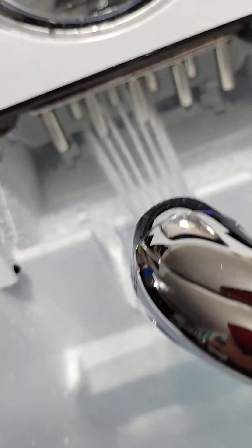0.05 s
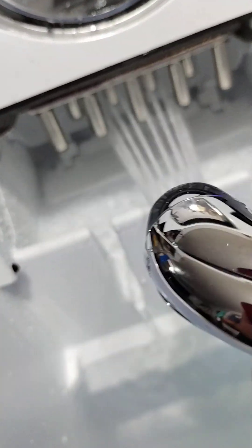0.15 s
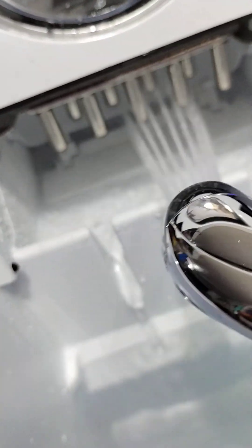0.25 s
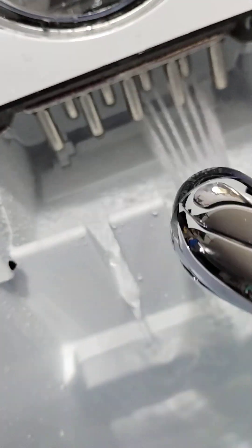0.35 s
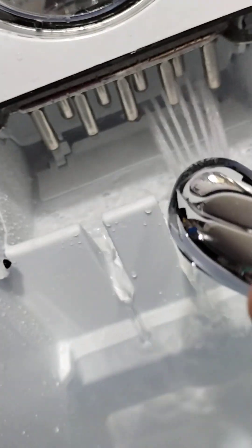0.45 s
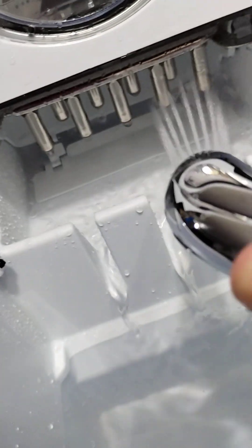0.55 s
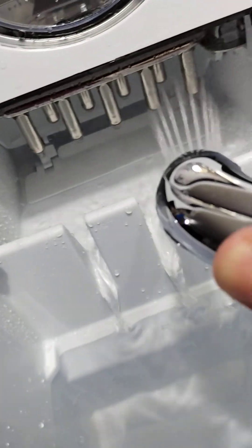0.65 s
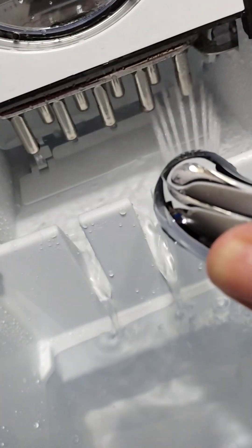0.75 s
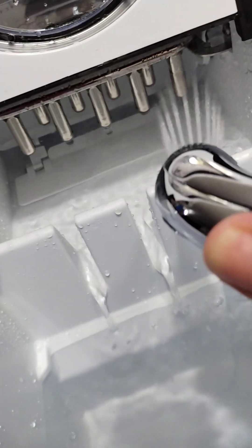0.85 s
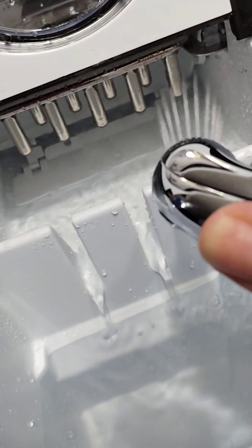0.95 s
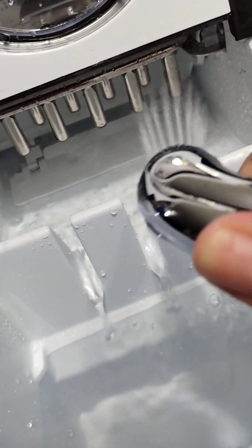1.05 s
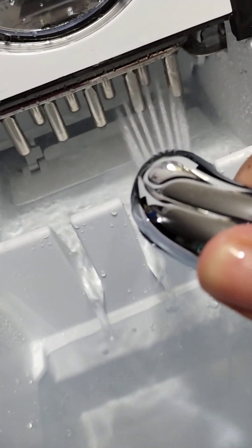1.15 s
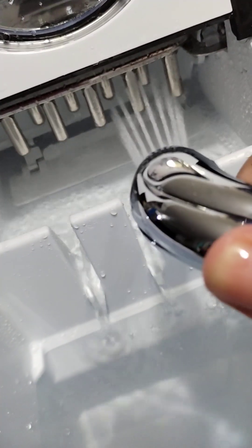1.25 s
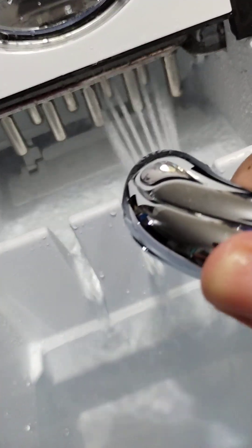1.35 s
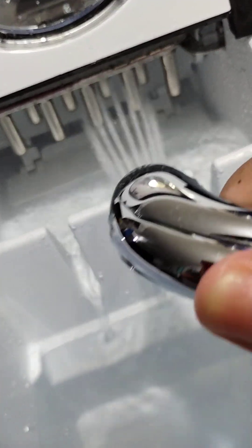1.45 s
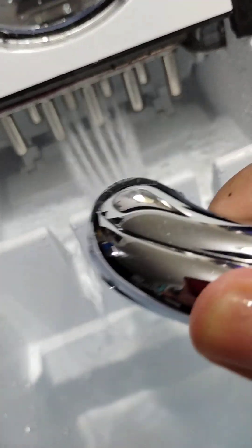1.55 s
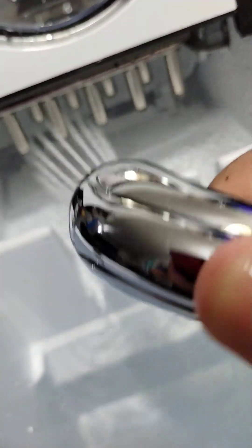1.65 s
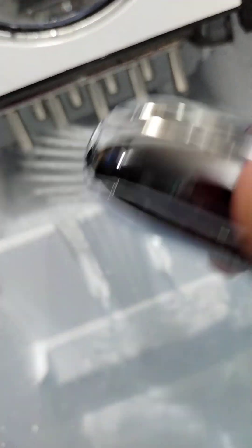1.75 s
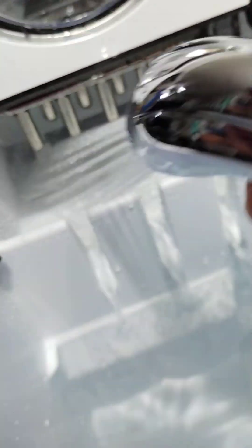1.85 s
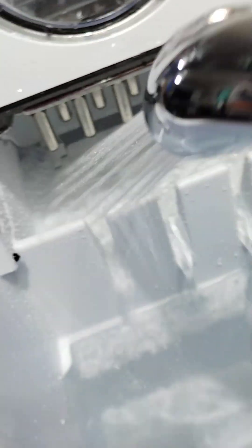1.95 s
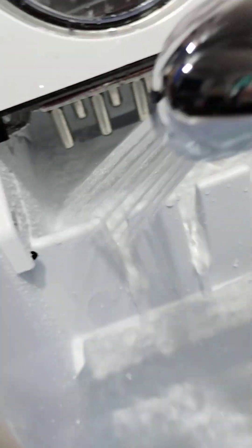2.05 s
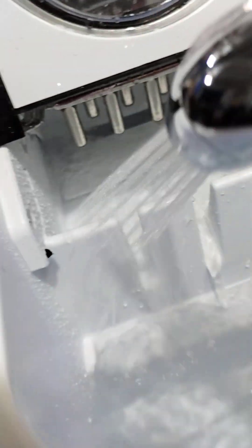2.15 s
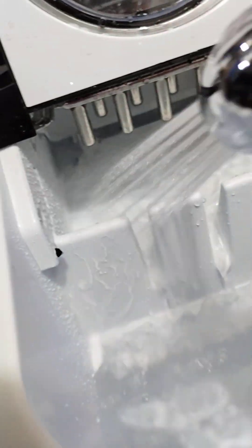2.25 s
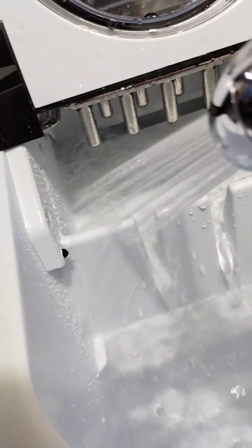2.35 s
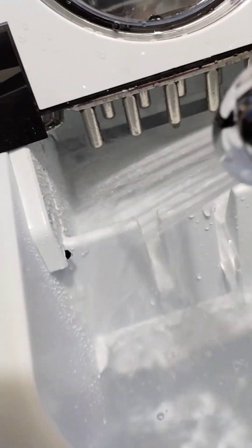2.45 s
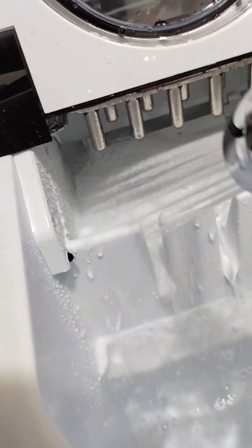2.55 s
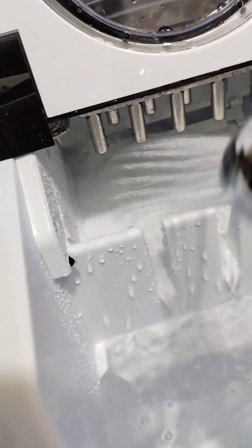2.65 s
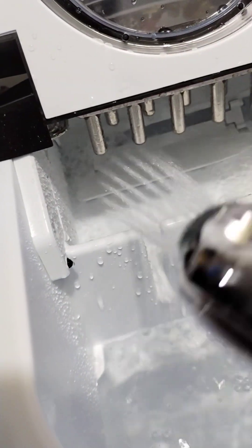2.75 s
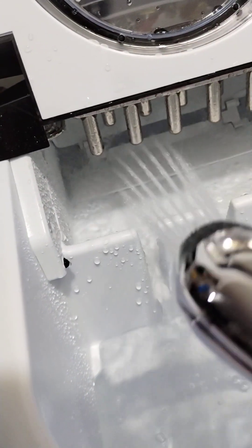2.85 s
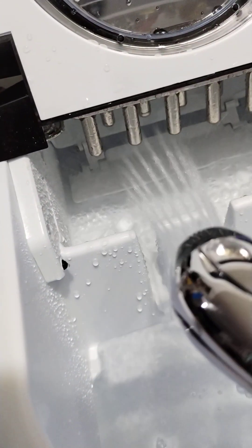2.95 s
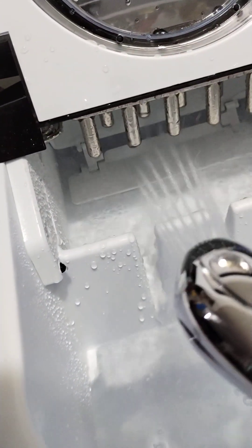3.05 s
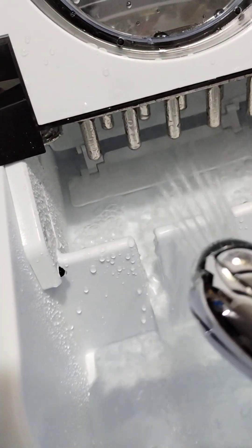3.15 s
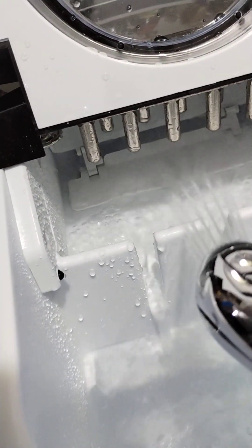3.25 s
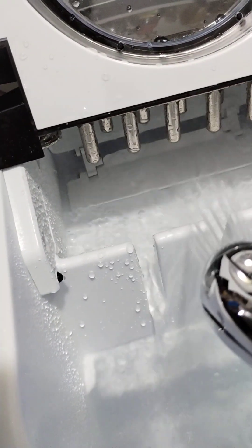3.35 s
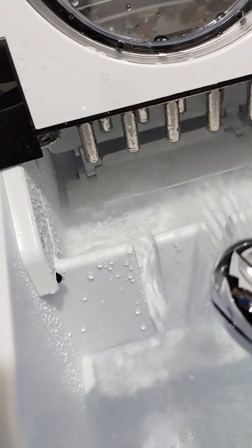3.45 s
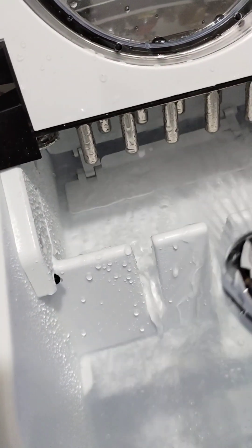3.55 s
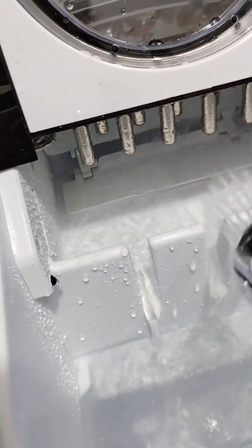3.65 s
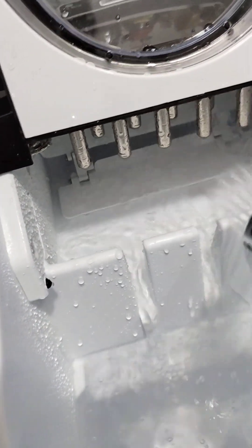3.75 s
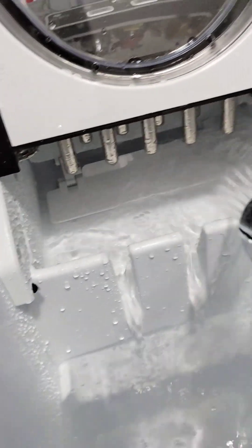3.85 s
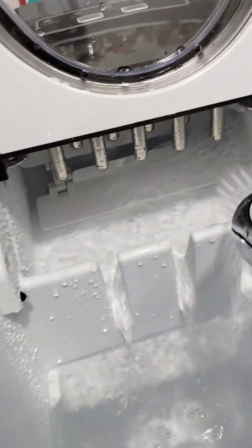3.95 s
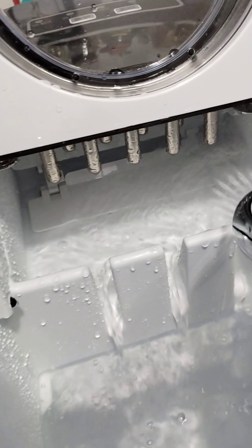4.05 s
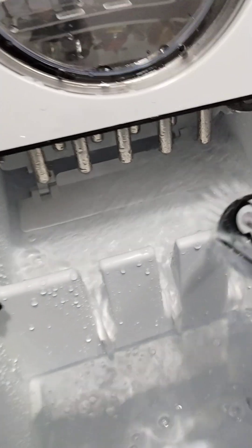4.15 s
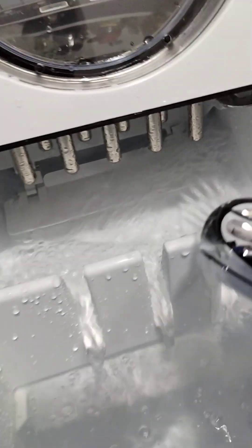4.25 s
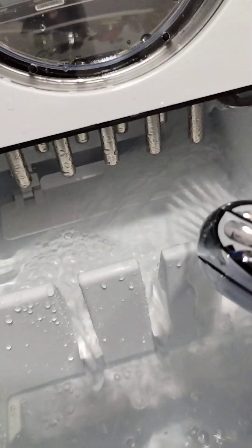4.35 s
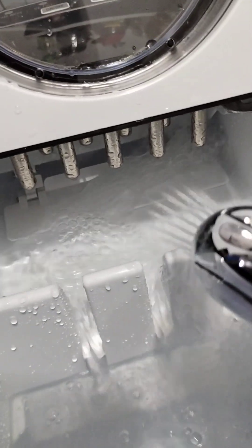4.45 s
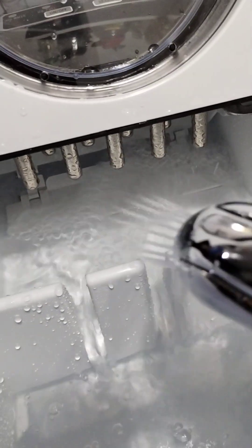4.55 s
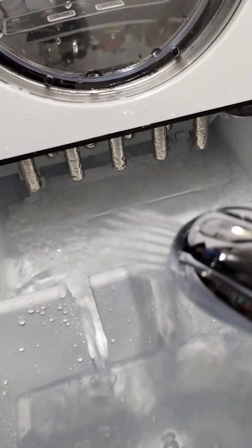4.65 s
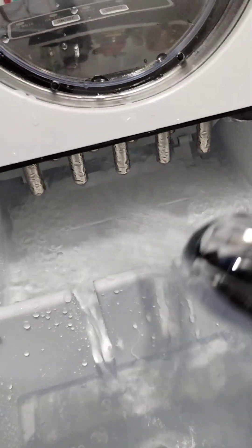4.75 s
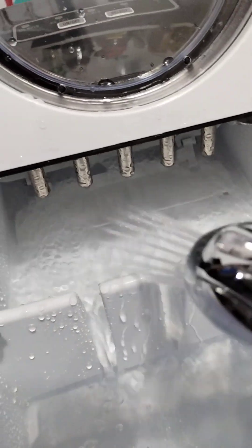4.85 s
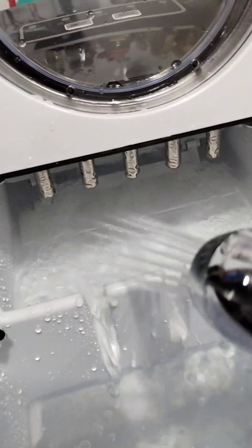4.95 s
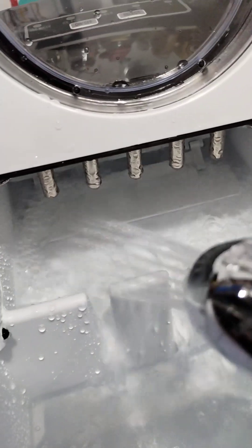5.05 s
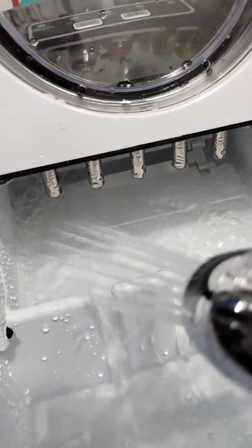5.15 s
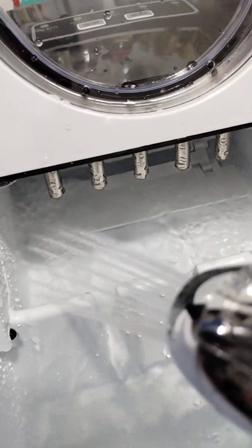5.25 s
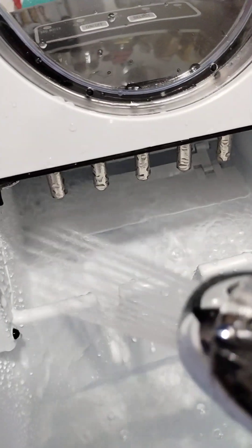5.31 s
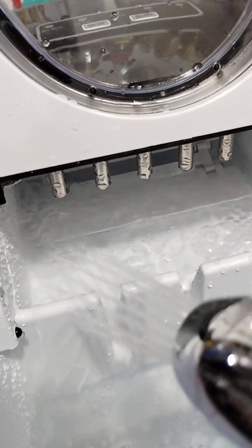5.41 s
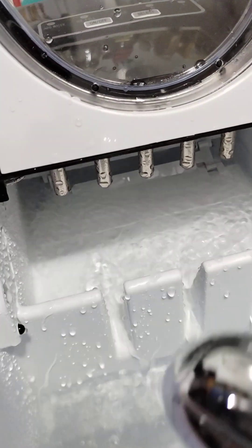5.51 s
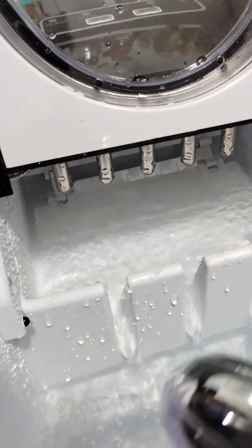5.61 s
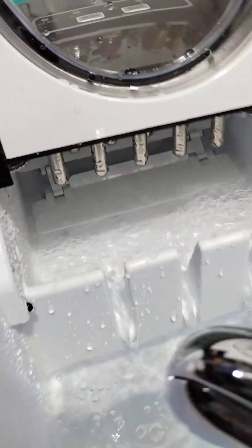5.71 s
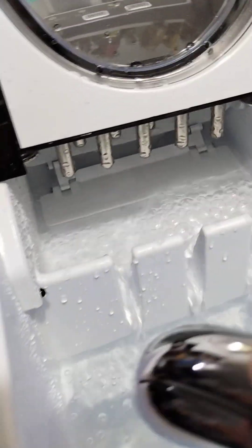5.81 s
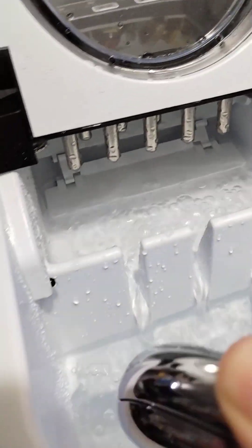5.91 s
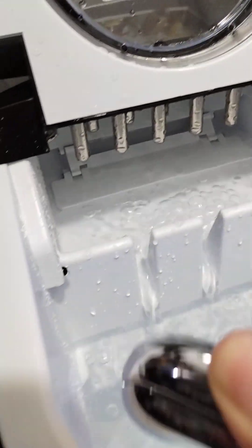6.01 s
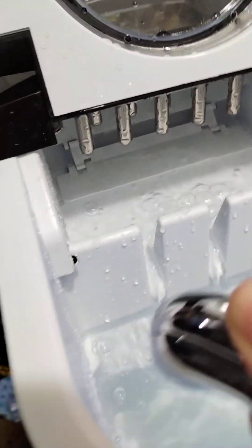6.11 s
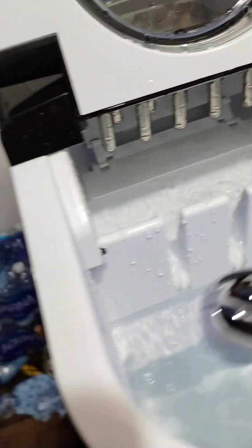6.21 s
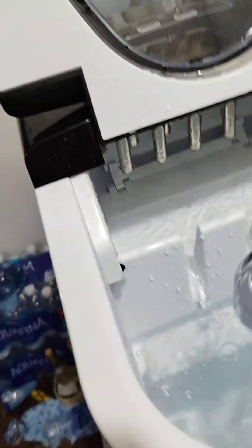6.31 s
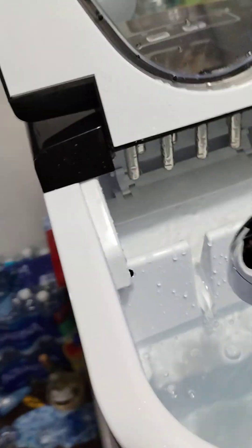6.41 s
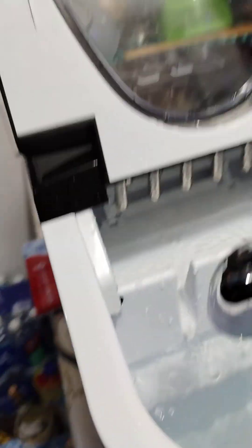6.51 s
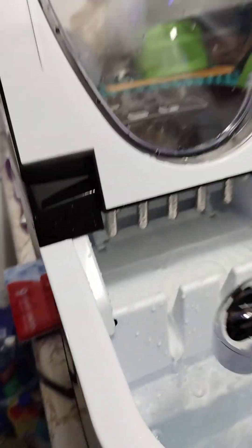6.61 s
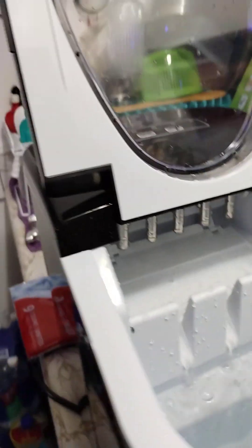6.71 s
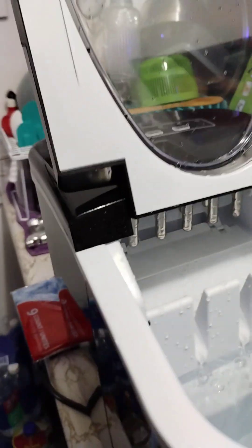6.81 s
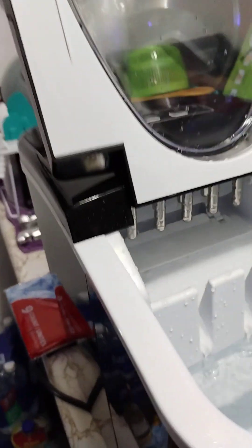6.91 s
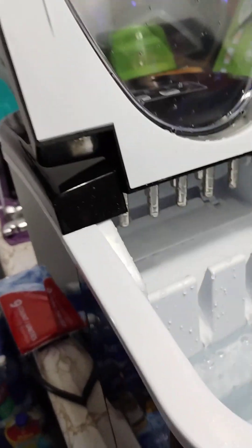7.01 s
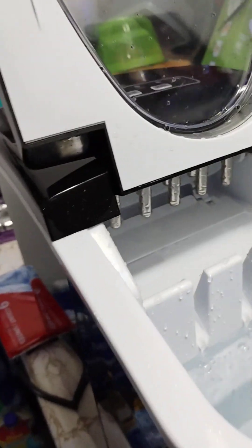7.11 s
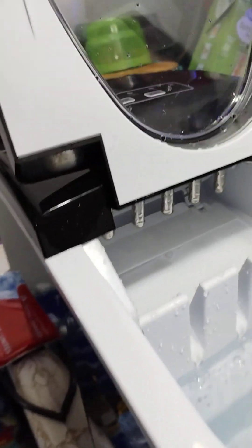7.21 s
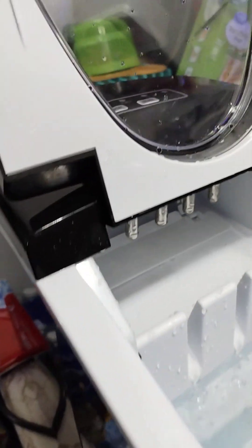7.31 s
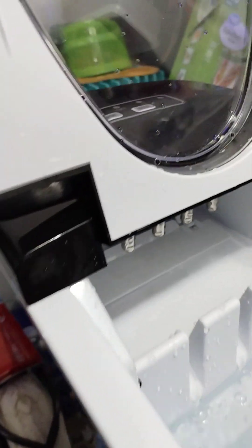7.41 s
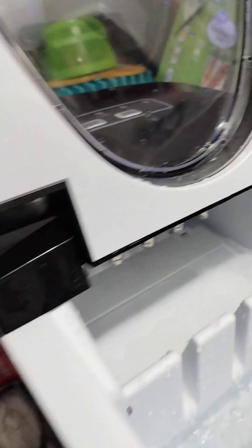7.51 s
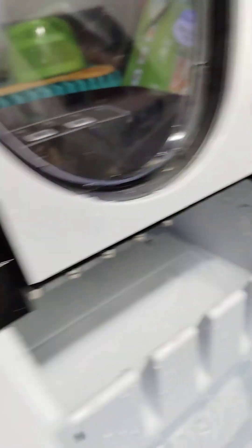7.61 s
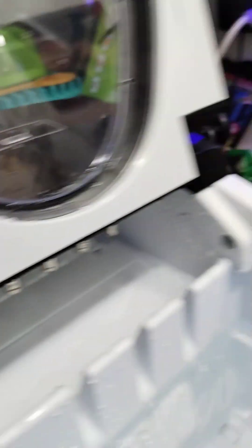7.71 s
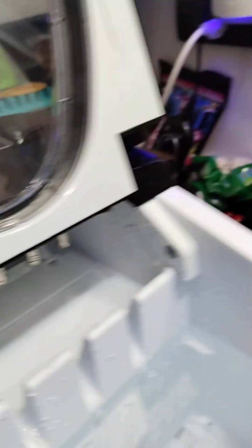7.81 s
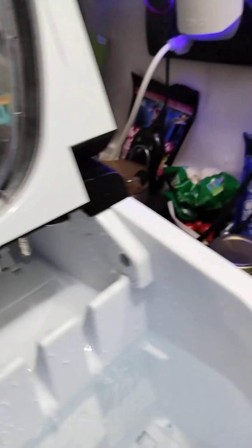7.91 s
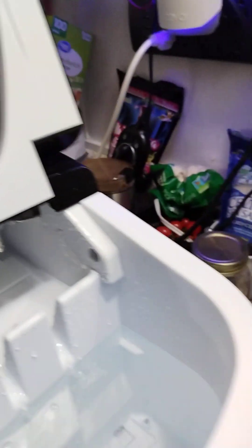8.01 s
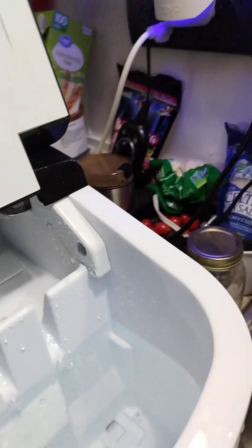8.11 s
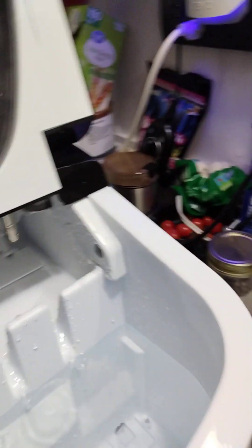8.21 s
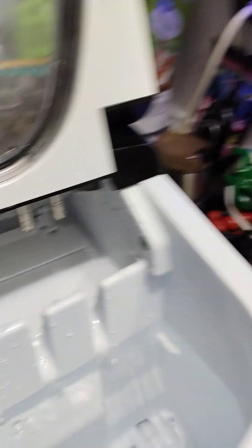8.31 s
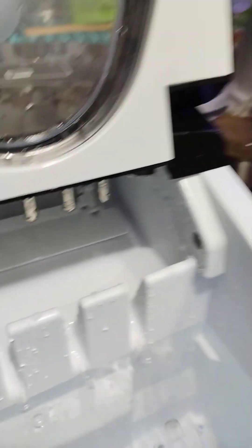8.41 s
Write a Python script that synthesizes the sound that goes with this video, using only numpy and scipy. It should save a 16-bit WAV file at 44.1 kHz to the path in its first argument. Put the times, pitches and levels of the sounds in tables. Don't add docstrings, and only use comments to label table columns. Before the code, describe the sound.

In a kitchen, heard in close stereo, a spray head hisses loudly over plastic, the fine treble leaning left, with snapping drops and shifting hollow drumming. Past the midpoint a plastic click and jolt shut the spray, water sags to a trickle, then a quieter aerated flow splashes in the sink while a tray gurgles empty. A faint motor drone sits behind. Low thuds and a scraping, juddering bin close the scene.

```python
import sys
import numpy as np
from scipy import signal
from scipy.io import wavfile
from scipy.ndimage import uniform_filter1d

SR = 44100
rng = np.random.default_rng(int(sys.argv[2]) if len(sys.argv) > 2 else 0)


def int16_out(signal):
    q = np.round(np.clip(np.atleast_2d(signal).T, -1, 1) * 32767)
    wavfile.write(sys.argv[1], SR, q.astype(np.int16))


def rack_gain(trim_db):
    fader = np.asarray(trim_db, float)
    return 10 ** (fader / 20)


N = 373382
HOP, FRAME = 128, 1024
HZ = np.fft.rfftfreq(FRAME, 1 / SR)[:, None]
FRAMES = N // HOP + 2
TIME = np.arange(FRAMES) * HOP / SR


def evened(x):
    return x / np.sqrt(np.mean(x ** 2) + 1e-20)


def read(points, hz=HZ):
    f, value = np.transpose(points)
    return np.interp(np.log(hz + 1), np.log(f + 1), value)


def peaks(modes):
    power = 0
    for hz, width, db in modes:
        power = power + rack_gain(db) ** 2 / (1 + (2 * (HZ - hz) / width) ** 2) ** 1.7
    return 10 * np.log10(power)


def over_time(points):
    return np.interp(TIME, *np.transpose(points))


def curves(rows):
    s, level_db, *rest = np.transpose(rows)
    return [np.interp(TIME, s, level_db, -120, -120)] + [np.interp(TIME, s, c) for c in rest]


def swelled(level_db, runs, offset_db):
    extra = 0
    for s, length, db in runs:
        shape = np.clip(1 - (2 * (TIME - s) / length - 1) ** 4, 0, 1)
        extra = extra + rack_gain(db + offset_db) ** 2 * shape
    return 10 * np.log10(rack_gain(level_db) ** 2 + extra)


def drift(size):
    return evened(uniform_filter1d(uniform_filter1d(rng.standard_normal(FRAMES), size), size))


def drops(per_s, spread_db, share):
    size = rack_gain(spread_db * np.minimum(rng.exponential(1, N), 3.3))
    size = size * (rng.random(N) < per_s / SR)
    burst = np.sqrt(signal.lfilter([1], [1, -.94], size ** 2))
    share = np.clip(share, 0, 1)
    return (share * evened(burst) + 1 - share) * rng.standard_normal((2, N))


def voiced(drive, layers, balance, same, lead, patchy_db, flicker_db):
    a, b = signal.stft(evened(drive), nperseg=FRAME, noverlap=FRAME - HOP)[2][:, :, :FRAMES]
    power = 0
    for shape_db, level_db in layers:
        wander_db = flicker_db * drift(size=9)
        power = power + evened(rack_gain(shape_db)) ** 2 * rack_gain(level_db + wander_db)[:a.shape[1]] ** 2
    patches = uniform_filter1d(rng.standard_normal(a.shape), size=14, axis=0)
    patches = evened(uniform_filter1d(patches, size=24, axis=1))
    c, lean = np.clip(read(same), 0, 1), rack_gain(read(balance))
    right = c * a * np.exp(-1j * read(lead)) + np.sqrt(1 - c ** 2) * b
    z = np.array([lean * a, right]) * 2 / np.sqrt(1 + lean ** 2 + c * lean)
    z = z * np.sqrt(power) * rack_gain(patchy_db * patches)
    return signal.istft(z, nperseg=FRAME, noverlap=FRAME - HOP)[1][:, :N]


def rings(modes, level_db):
    out = np.zeros((2, N))
    for hz, width, db in modes:
        a, b = rng.standard_normal((2, N))
        both = [a, 1.76 * a + 0.56 * b]
        out += rack_gain(db) * evened(signal.lfilter(*signal.iirpeak(hz, hz / width, SR), both))
    return out * rack_gain(np.interp(np.arange(N), np.arange(FRAMES) * HOP, level_db))


def hits(rows, rise_s):
    out, t = np.zeros((2, N)), np.arange(SR // 4) / SR
    for s, db, hz, t60, lean_db in rows:
        ring = np.sin(2 * np.pi * hz * t) + 0.39 * np.sin(2 * np.pi * 1.17 * hz * t)
        ring *= rack_gain(db - 60 * t / t60) * (1 - np.exp(-t / rise_s))
        part = out[:, round(s * SR):][:, :len(t)]
        ports_db = np.array([[lean_db / 2], [-lean_db / 2]]) - abs(lean_db) / 4
        part += rack_gain(ports_db) * ring[:part.shape[1]]
    return out


# f/Hz, level/dB per Hz
FIZZ = [(2500, -32), (4200, -13.5), (5000, -16), (6800, -10.5), (8000, -6.5), (9000, 1.5), (10000, -3.5),
        (11500, -10.5), (13000, -14), (15000, -12.5)]
# t/s, brightness/dB per octave, hiss centre/share of its usual pitch
FACING = [(0, 7, 0.99), (.6, 1.5, 1.01), (1.2, 3, 0.99), (1.45, 4, 1.01), (1.75, 2.5, 1.03), (1.9, 0, 0.99),
          (2.4, -1, 0.99), (2.65, 1, 1.016), (3.0, 4, 1.005), (3.8, 1, 0.99), (4.3, -3.5, 1.),
          (4.6, 8, .99), (4.9, -5, .98), (5.2, -3, 0.99), (5.6, -6, .97)]


def fizz_colour():
    s, tilt_db, share = np.transpose(FACING)
    hz = HZ / np.interp(TIME, s, share)
    octaves_up = np.log2(np.maximum(hz, 9500) / 9500)
    return read(FIZZ, hz) + np.interp(TIME, s, tilt_db) * octaves_up


# t/s, force of the fine drops/dB, lean from the tray towards the walls/dB
JETS = [(0, -21.5, -1.5), (.3, -21.5, 1), (.55, -22.5, -2), (.8, -21.5, 3), (1.1, -21.5, 0),
        (1.45, -23, 1.3), (1.95, -20.5, 1), (2.4, -20, 0.3), (2.85, -21.5, -2.5), (3.2, -20.5, 1.5),
        (3.6, -21, 2.5), (3.85, -21, -1.5), (4.15, -18.5, -4), (4.5, -21.5, -0.5), (4.7, -22, 2),
        (4.85, -20, 2), (5.2, -21.5, -1.5), (5.57, -21, -3.5)]
# middle t/s, half length/s, loss/dB
LULLS = [(0.115, .03, 3.5), (0.436, .008, 6), (1.339, .018, 4), (1.372, 0.018, 5), (1.83, .01, 2.5),
         (5.45, 0.024, -1.5), (1.53, 0.064, 1), (1.782, 0.015, 4.5), (2.473, 0.021, 5), (3.153, 0.072, 5.5),
         (3.895, 0.048, 1.5), (4.483, .05, 2), (5.122, 0.016, 1.5)]
# start t/s, length/s, level/dB
BURSTS = [(0.343, 0.038, -17.5), (0.409, 0.051, -25), (0.648, 0.34, -17), (0.95, 0.034, -17),
          (1.03, 0.064, -20), (1.984, 0.081, -20), (2.226, 0.043, -20), (2.572, 0.11, -20.5),
          (3.223, 0.041, -19), (3.293, 0.029, -19), (3.336, 0.052, -21), (3.452, 0.056, -18),
          (3.487, 0.045, -20), (3.607, 0.03, -14), (3.66, 0.046, -15.5), (3.941, 0.042, -19),
          (4.06, 0.1, -18), (4.254, 0.054, -19), (4.37, 0.037, -21), (4.958, 0.043, -16.5),
          (5.064, 0.062, -15), (5.237, 0.039, -20), (5.32, 0.063, -18)]
# start t/s, length/s, level/dB
PANEL_RUNS = [(0.01, 0.077, -29), (0.715, 0.13, -25), (.92, 0.09, -40), (1.273, 0.054, -32),
              (1.7, 0.23, -30), (1.93, 0.041, -31), (2.354, 0.068, -30.5), (2.724, 0.29, -31),
              (3.38, 0.17, -29.5), (3.58, 0.16, -29), (4.1, 0.092, -31), (4.302, .08, -37),
              (4.66, 0.35, -29.5), (5.028, 0.086, -29.5), (5.17, 0.082, -31.5)]
# start t/s, length/s, level/dB
PLUNGES = [(0.07, 0.058, -31.5), (0.258, 0.12, -32), (0.73, 0.06, -31), (1.048, 0.045, -33),
           (1.22, 0.11, -30.5), (1.422, 0.22, -29), (1.85, 0.26, -34.5), (2.472, 0.28, -32),
           (2.777, .27, -29), (3.12, .12, -33.5), (3.295, 0.23, -34), (3.935, 0.089, -33), (4.6, 0.3, -35),
           (4.9, 0.21, -34), (5.12, .27, -31.5)]
# start t/s, length/s, level/dB
TRAY_RUNS = [
    (0., 0.47, -32),
    (2.202, 0.24, -41),
    (2.76, 0.11, -34),
    (3.725, .08, -36),
    (4.103, 0.16, -35),
    (4.727, 0.26, -35),
    (5.24, 0.027, -30.5),
    (5.454, 0.075, -34),
]
WALLS_DB, TRAY_DB, PATTER_DB, POOL_DB = -36.5, -35.5, -28, -39.5
USUAL_DB, WALLS_FOLLOW, TRAY_FOLLOW, PATTER_FOLLOW = -23, 0.06, 0.13, 0.19
WALLS_LEAN, TRAY_LEAN = 0.63, -1.08
DROWN_DB_PER_S = 0.93
SHUT_S, SHUT_DB_PER_S, RING_ON_DB, RING_ON_S = 5.588, 1200, -4, 0.025


def spray_levels():
    s, force_db, aim = np.transpose(JETS)
    force_db, aim = np.interp(TIME, s, force_db), np.interp(TIME, s, aim)
    for middle_s, half_s, loss_db in LULLS:
        force_db = force_db - loss_db * np.exp(-((TIME - middle_s) / half_s) ** 2)
    change = force_db - USUAL_DB
    shut = SHUT_DB_PER_S * np.maximum(TIME - SHUT_S, 0)
    ring_on = np.where(TIME < SHUT_S + RING_ON_S, np.maximum(-shut, RING_ON_DB), -shut)
    walls = WALLS_DB + WALLS_FOLLOW * change + WALLS_LEAN * aim
    tray = TRAY_DB + TRAY_FOLLOW * change + TRAY_LEAN * aim
    return [swelled(force_db + 0.5, BURSTS, -4) - shut,
            swelled(walls, PANEL_RUNS, -5) + ring_on,
            swelled(POOL_DB + 0 * TIME, PLUNGES, -6) + ring_on,
            swelled(tray, TRAY_RUNS, 0) + ring_on,
            PATTER_DB + PATTER_FOLLOW * change - DROWN_DB_PER_S * TIME - shut]


# t/s, level/dB, fade/s
SLAPS = [
    (1.396, -15.5, 0.033),
    (1.631, -13, 0.012),
    (1.697, -13, 0.018),
    (1.798, -17, 0.013),
    (3.936, -19, .015),
    (4.374, -17, 0.012),
    (4.722, -22, .015),
    (5.239, -15, .02),
]


def slaps():
    t = np.arange(N) / SR
    level = np.zeros(N)
    for s, db, fade_s in SLAPS:
        at = slice(round(s * SR), round((s + .15) * SR))
        level[at] += rack_gain(db) * np.exp(-(t[at] - s) / fade_s)
    treble = signal.butter(1, [8300, 10300], "band", fs=SR, output="sos")
    return signal.sosfilt(treble, level * rng.standard_normal(N)) * rack_gain([[9], [-10]])


# f/Hz, level/dB per Hz
PATTER = [(100, -42), (250, -9), (700, -39), (1100, -9), (1400, -5), (2300, -1), (3000, -2.5), (4200, -4),
          (5500, -5), (7000, -15)]
# f/Hz, width/Hz, level/dB
WALLS = [(363.7, 49, -1), (419.8, 30.5, 3), (321, 26, -15), (566, 150, -9.5), (945, 460, -18.5)]
# f/Hz, width/Hz, level/dB under the drumming
WALL_RINGS = [(352.8, 8, -4.5), (424, 8, -3.5)]
CAVITY = 660, 21, 179, -3.5
# f/Hz, width/Hz, level/dB under the pool
POOL_RING = [(742, 22, -4.5)]
# f/Hz, width/Hz, level/dB
TRAY = [(1756, 120, 5), (1580, 1600, -15), (1997, 480, -5)]
# t/s, share of the usual pitch
TRAY_PITCH = [(0, 1), (.4, 1.02), (.7, 1.02), (1.5, 0.99), (2.2, 1.016), (3.2, 0.98), (4., 1.008),
              (5.6, 1.016)]
# f/Hz, width/Hz, level/dB
RIBS = [(2775, 160, -1), (3150, 160, -1), (3420, 300, -4.5), (3840, 140, -2.5)]
# t/s, level/dB
RIBS_STRUCK = [(0, -34), (.3, -30.5), (.5, -32.5), (.8, -29.5), (1.05, -38.5), (1.35, -30), (1.8, -33.5),
               (2.2, -40), (2.5, -39), (2.85, -37.5), (3.2, -49), (4.8, -35.5), (5.2, -58), (5.45, -48),
               (5.56, -43), (5.6, -90)]
# f/Hz, left over right/dB
SPRAY_BALANCE = [(60, 5), (92, -9), (140, -15), (210, 4), (330, -4.5), (500, 7.5), (760, -1.5), (1160, 2),
                 (1770, -6.5), (2710, -1.5), (4130, -1.5), (6310, 4.5), (9630, 24.5), (14700, 13)]
# f/Hz, likeness of the ports/0-1
SPRAY_SAME = [(100, 0.9), (400, 0.95), (860, 0.58), (1300, 0.23), (2200, 0.43), (2800, 0.31), (3500, 0.58),
              (4500, 0.16), (14000, 0.038)]
# f/Hz, lead of the left port/radians
SPRAY_LEAD = [(100, 0.12), (520, 1.06), (860, 0.11), (1200, 1.1), (1550, 0.33), (1900, 1.7), (2250, 3.5),
              (3300, 4.82), (4000, 7.56), (5300, 9.2), (14000, 29)]


def spray():
    fizz, walls, pool, tray, patter = np.array(spray_levels()) + 0.6 * drift(size=5)
    start_hz, rise, width, db = CAVITY
    pitch = over_time(TRAY_PITCH)
    tray_modes = [(hz * pitch, w, d) for hz, w, d in TRAY]
    layers = [(fizz_colour(), fizz), (peaks(WALLS), walls),
              (peaks([(start_hz + rise * TIME, width, db)]), pool),
              (peaks(tray_modes), tray), (read(PATTER), patter),
              (peaks(RIBS), curves(RIBS_STRUCK)[0])]
    wet = voiced(drops(1200, 3.6, 0.24), layers, SPRAY_BALANCE, SPRAY_SAME, SPRAY_LEAD, 0.98, 0.7)
    return wet + rings(WALL_RINGS, walls) + rings(POOL_RING, pool) + slaps()


# t/s, peak level/dB, f/Hz
SNAPS = [(.4143, -8, 9300), (.4143, -13, 11200), (.4265, -11, 8900), (.445, -13, 10800), (.45, -6, 9100),
         (.45, -9, 10600), (.455, -6, 8900), (.451, -17, 7200), (3.831, -13, 5650), (3.832, -17, 6260),
         (4.125, -3, 7900), (1.0385, -20, 3260), (1.3199, -18, 3410), (2.5651, -21, 3870),
         (3.1557, -28, 3340), (4.5361, -22, 3720), (5.2929, -22, 4480), (.483, -23, 3400),
         (.865, -20, 3300), (4.3, -18, 7200), (1.277, -14, 9000), (1.313, -11, 9550), (1.313, -16, 8300),
         (1.482, -15, 10500), (4.65, -13, 7000)]


def snaps():
    return hits([(s, db, hz, 106 / hz, read(SPRAY_BALANCE, hz)) for s, db, hz in SNAPS], 0.00009)


# t/s, peak level/dB, f/Hz, t60/s
CLACKS = [
    (5.569, -14.5, 1500, 0.029),
    (5.568, -28, 1800, 0.014),
    (5.569, -19, 3880, .01),
    (5.569, -22, 6000, .01),
    (5.6935, -34, 1770, .036),
    (5.751, -31, 1100, 0.033),
    (5.766, -33, 915, 0.1),
    (6.2, -44, 1300, .07),
    (6.301, -46, 1860, .07),
    (3.745, -20.5, 1795, 0.067),
]


def clacks():
    return hits([(*row, -9.5) for row in CLACKS], 0.00009)


# t/s, peak level/dB, f/Hz, left over right/dB
HOSE_JOLT = [
    (5.585, -24, 277, -9),
    (5.5975, -16.5, 123, -5),
]
# t/s, peak level/dB, f/Hz, left over right/dB
BLOWS = [(8.167, -24, 115, -2), (8.215, -29, 132, -2), (8.135, -36, 140, -2), (8.405, -25, 520, 0),
         (8.44, -29, 530, 0), (8.293, -26, 917, -5), (8.296, -24, 304, -2), (8.335, -19, 490, -2),
         (8.345, -23.5, 660, -4), (8.325, -30, 960, -3), (8.17, -34, 519, -2), (8.378, -12, 529, 10),
         (8.384, -14, 112, -4), (8.19, -26, 127, -2), (8.24, -28, 410, -2), (8.385, -26, 1090, 6),
         (8.411, -19, 112, -6)]


def blows():
    rows = []
    for s, db, hz, lean_db in list(HOSE_JOLT) + list(BLOWS):
        t60_s = 0.16 * (100 / hz) ** 0.25
        rows.append((s, db, hz, t60_s, lean_db))
    return hits(rows, 0.0035)


# t/s, force/dB, how far it has moved into the sink/0-1
STREAM = [
    (5.745, -58, .5),
    (5.76, -35, 0.75),
    (5.81, -33.5, 0.17),
    (6.5, -32.5, 0.02),
    (6.75, -35.5, 0.43),
    (7.15, -36, 0.95),
    (7.9, -35.5, 0.82),
    (8.3, -34.5, 0.78),
    (8.455, -33, 0.67),
    (8.47, -44, 0.5),
]
NEAR_DB = [-11.5, -3.5, -15]
FAR_DB = [-2, -5, -11.5]
# start t/s, end t/s
DRIBBLE_S = (5.6, 5.75)
DRIBBLE_DB = [-39, -51, -55, -51]
DRIBBLE_SAG_DB_PER_S = [28, 32, 66, 5]


def stream_levels():
    force_db, far = curves(STREAM)
    flow = [force_db] + [force_db + a + (b - a) * far for a, b in zip(NEAR_DB, FAR_DB)]
    start, end = DRIBBLE_S
    dribble = np.array(DRIBBLE_DB)[:, None] - np.outer(DRIBBLE_SAG_DB_PER_S, TIME - start)
    outside_s = np.maximum(start - TIME, 0) + np.maximum(TIME - end, 0)
    return np.maximum(flow, dribble - SHUT_DB_PER_S * outside_s)


# f/Hz, level/dB per Hz
STREAM_FIZZ = [(4000, -20.5), (5800, -11.5), (7300, -9), (7800, -5), (8900, -2), (9700, -2.5), (10000, -9),
               (11000, -17), (12500, -20), (15000, -21)]
# f/Hz, width/Hz, level/dB
FROTH_LOW = [(2450, 400, -4.5), (2633, 89, 1.5), (2924, 170, 3), (3300, 280, -4)]
# f/Hz, level/dB per Hz
FROTH_HIGH = [(2000, -36), (3400, -7.5), (3780, -1.5), (4570, -5), (4950, -4), (5240, -6), (5770, -3.5),
              (7000, -8), (9100, -22), (15400, -120)]
# f/Hz, width/Hz, level/dB
BASIN = [(540, 24, -9), (713, 58, -2), (1362, 160, 1), (1612, 58, 4.5), (1830, 540, -9.5), (302, 44, -5),
         (434, 450, -6.5)]
# t/s, f/Hz
BASIN_NOTE = [(5.75, 915), (6.5, 945), (6.8, 1010), (7.3, 1010), (8.47, 976)]
# f/Hz, level/dB per Hz
MIST = [(6000, -30), (9500, 2), (11000, 1), (14500, -1)]
# f/Hz, left over right/dB
STREAM_BALANCE = [(60, -2.0), (99, -3.5), (160, 6), (270, -2), (440, -1), (730, -5.5), (1210, -7),
                  (1990, -4), (3280, -7), (5410, -5.5), (8920, 15.5), (14700, 3.5)]
# f/Hz, likeness of the ports/0-1
STREAM_SAME = [(100, 0.99), (500, 0.51), (1200, 0.56), (1900, 0.12), (4000, 0.083), (14000, 0.041)]
# f/Hz, lead of the left port/radians
STREAM_LEAD = [(100, 4), (520, -1.9), (860, -3), (1200, -2.5), (1550, -4), (4400, -6), (14000, -33)]
MIST_DB, DRAIN_DB, DRAIN_DB_PER_S = -45.5, -39.5, 18
DRAIN_WAITS_DB = 5.5


def stream():
    fizz, low, high, basin = stream_levels() + 1.07 * drift(size=5)
    after = TIME - DRIBBLE_S[0]
    mist = np.where(after > 0, MIST_DB, -120)
    drain = DRAIN_DB - DRAIN_DB_PER_S * after - DRAIN_WAITS_DB * (TIME < DRIBBLE_S[1])
    drain = np.where(after > 0, drain, -120)
    layers = [(read(STREAM_FIZZ), fizz), (peaks(FROTH_LOW), low), (read(FROTH_HIGH), high),
              (peaks(BASIN), basin), (read(MIST), mist),
              (peaks([(over_time(BASIN_NOTE), 90, 0)]), basin - 3),
              (peaks(list(TRAY) + [(865, 290, 0)]), drain)]
    return voiced(drops(3000, 2.0, .17), layers, STREAM_BALANCE, STREAM_SAME, STREAM_LEAD, 1.3, .9)


# t/s, level/dB
DRAG = [(8.03, -59), (8.15, -44), (8.162, -42), (8.175, -34), (8.207, -33.5), (8.235, -37), (8.275, -39),
        (8.313, -30), (8.347, -29), (8.375, -32), (8.395, -28), (8.43, -32), (8.467, -34)]
# f/Hz, width/Hz, level/dB
DRAG_LOW = [(75, 61, -2), (125, 60, 2), (218, 90, -9), (313, 55, -1.5)]
# f/Hz, width/Hz, level/dB
DRAG_HOLLOW = [(500, 48, 5), (680, 82, -6), (900, 180, -4.5), (1270, 130, -14), (450, 60, -6)]


def drag():
    low = curves(DRAG)[0]
    layers = [(peaks(DRAG_LOW), low), (peaks(DRAG_HOLLOW), low - 4.5)]
    balance, same = [(100, -2.0), (500, -3.0), (1000, -13)], [(100, 0.99), (1000, 0.35)]
    return voiced(drops(110, 3.0, 0.35), layers, balance, same, [(0, 0)], 0.74, 0.58)


# t/s, peak level/dB, f/Hz, t60/s
NUDGES = [
    (5.59, -30, 45, .2),
    (6.56, -42, 45, .2),
    (7.13, -46, 55, .15),
    (8.04, -40, 50, .2),
    (8.1, -36, 380, 0.11),
    (8.09, -38, 706, 0.11),
]


def nudges():
    return hits([(*row, -2) for row in NUDGES], 0.0086)


# f/Hz, width/Hz, level/dB
HUM = [(121, 16, 6.5), (77, 220, -14), (163, 50, -5), (213, 54, -11)]
# t/s, level/dB
HUM_DB = [
    (0, -55.5),
    (2, -56),
    (5.5, -63),
    (5.65, -48),
    (7.2, -53.5),
    (8.47, -49),
]
# f/Hz, width/Hz, level/dB under the drone
HUM_RINGS = [(117, 3.5, -1), (135, 7, -5), (279, 8, -12), (352, 7, -11), (430, 7, -13), (527, 8, -7),
             (1010, 12, -10)]


def hum():
    level_db = curves(HUM_DB)[0]
    balance, same = [(50, -9), (120, -2.0), (400, 3)], [(50, 0.98), (400, 0.92)]
    noise = rng.standard_normal((2, N))
    drone = voiced(noise, [(peaks(HUM), level_db)], balance, same, [(0, 0)], 0.35, 0.77)
    return drone + rings(HUM_RINGS, level_db)


def scene():
    water = np.clip(spray(), -0.7, 0.7) + snaps() + stream()
    knocks = clacks() + blows() + nudges()
    return water + knocks + drag() + hum()


# f/Hz, level/dB against its neighbours
DROPOUT = [
    [(1100, -30), (1400, -11), (1750, -16), (2100, -4.5), (3000, -4.5), (5000, -4), (6500, -8), (8000, -16),
     (14000, -11)],
    [(1400, -30), (2000, -6.5), (5000, -4.5), (7000, -5), (9500, -4), (11000, -.5), (12200, -2.5),
     (14000, -4.5)],
]
# t/s, spread/s, f/Hz, spread/Hz, raised threshold/dB
THIN_MID = [(.5, .025, 4350, 180, 18), (.62, .06, 4500, 400, 5), (.74, .018, 4850, 250, 26),
            (.81, .04, 4300, 150, 20), (.88, .05, 4450, 200, 8), (.96, .022, 4500, 250, 28),
            (1.017, .012, 4950, 200, 22), (1.056, .022, 4450, 300, 40), (1.17, .06, 4350, 80, 12),
            (.43, .02, 4650, 250, 15), (1.27, .018, 4400, 200, 22), (1.88, .05, 5050, 250, 14),
            (3.31, .06, 2850, 300, 26), (3.48, .06, 2250, 150, 17), (3.73, .11, 2900, 220, 16),
            (3.79, .04, 4500, 250, 16), (3.96, .04, 2700, 250, 16), (4.1, .08, 4400, 200, 15),
            (4.27, .05, 4400, 220, 20), (4.13, .07, 2780, 180, 20), (5.25, .3, 3200, 500, 5),
            (5.09, .03, 2300, 150, 20), (5.15, .02, 2750, 150, 24), (5.23, .04, 2350, 100, 18),
            (5.265, .015, 2500, 200, 26), (5.245, .015, 3550, 120, 20), (5.29, .015, 3250, 120, 22),
            (5.34, .025, 2950, 100, 16), (4.82, .02, 2700, 120, 20), (5.69, .07, 4900, 1300, 9),
            (5.685, .02, 3580, 90, 20), (5.71, .02, 3950, 90, 20), (5.73, .018, 5150, 100, 20),
            (5.53, .04, 2250, 120, 15), (5.51, .03, 3300, 120, 14), (1.6, .06, 4800, 200, 9),
            (2.6, .5, 2600, 500, 3), (4.6, .3, 2700, 500, 2), (4.9, .7, 1420, 130, 11),
            (1.15, .3, 2100, 130, 7)]


def drop_faint_bands(x, joint_hz):
    frame = dict(window="cosine", nperseg=2048, noverlap=1024)
    lead = 1024 - 318
    hz, t, z = signal.stft(np.pad(x, ((0, 0), (lead, 0))), SR, **frame)
    joint = ((hz > joint_hz[0]) & (hz < joint_hz[1]))[:, None]

    def turn(v):
        return np.where(joint, np.array([v[0] + v[1], v[0] - v[1]]) / np.sqrt(2), v)

    z = turn(z)
    edges = np.r_[0:260:6, 260:1024:10]
    widths = np.diff(np.r_[edges, len(hz)])
    band_hz = hz[edges, None]
    band_db = np.add.reduceat(abs(z) ** 2, edges, axis=1) / widths[:, None]
    band_db = 10 * np.log10(band_db + 1e-14)
    around_db = uniform_filter1d(band_db, size=9, axis=1)
    around_db = np.where(joint[edges], around_db.mean(0), around_db)
    loud_db = 10 * np.log10((abs(z) ** 2).mean((0, 1)) + 1e-14)
    under_db = uniform_filter1d(loud_db - around_db[0], size=5, axis=1) - 1.5
    faint_db = np.clip(2 * under_db, 0, np.where(t < 6.95, 12, 6)) * (band_hz > 10500)
    margin_db = np.array([read(side, band_hz) for side in DROPOUT])
    margin_db = margin_db + faint_db * np.array([1, .1])[:, None, None]
    quiet_db = np.clip(.3 * (loud_db - np.median(loud_db)), -3.5, 0)
    margin_db += joint[edges] * quiet_db
    for s, spread_s, centre_hz, spread_hz, db in THIN_MID:
        off_time, off_hz = (t - lead / SR - s) / spread_s, (band_hz - centre_hz) / spread_hz
        margin_db[0] += db * np.exp(-off_time ** 2 - off_hz ** 2)
    whim_db = 3.5 * evened(rng.standard_normal(band_db.shape))
    whim_db = np.where(band_hz > 12000, whim_db[0], whim_db)
    keep = np.repeat(band_db - around_db + whim_db > margin_db, widths, axis=1)
    keep = keep & (hz < 14250)[:, None]
    return signal.istft(turn(z * keep), SR, **frame)[1][:, lead:lead + N]


def roll_off(x):
    return signal.sosfilt(signal.butter(12, 15310, fs=SR, output="sos"), x)


def record(dry):
    thin = signal.sosfilt(signal.butter(2, 75, "high", fs=SR, output="sos"), dry)
    mix = drop_faint_bands(np.clip(thin, -1.05, 1.05), (1250, 5400))
    return roll_off(mix)


dry = scene()
out = record(dry)
int16_out(out)
```